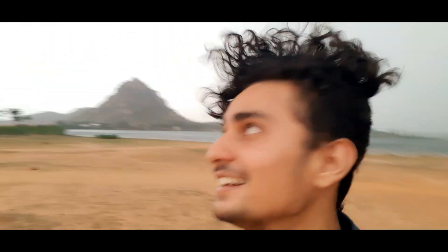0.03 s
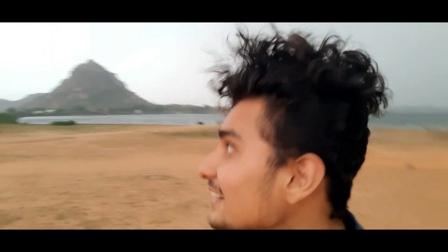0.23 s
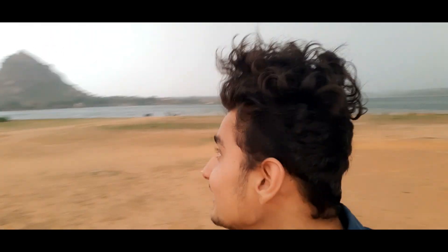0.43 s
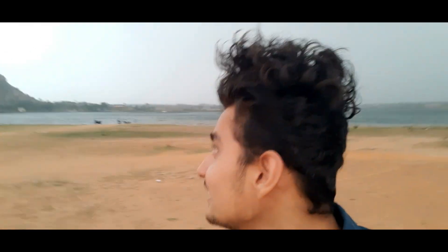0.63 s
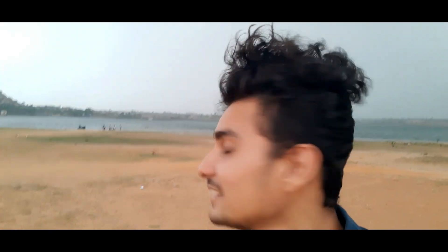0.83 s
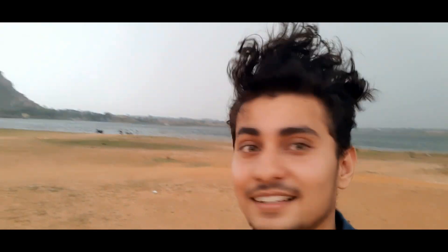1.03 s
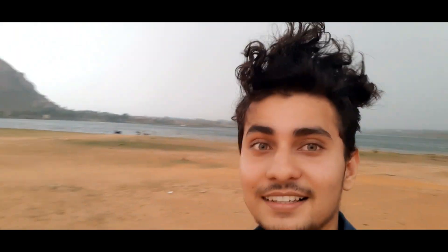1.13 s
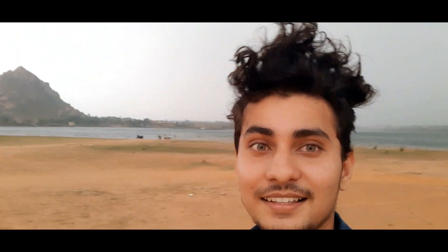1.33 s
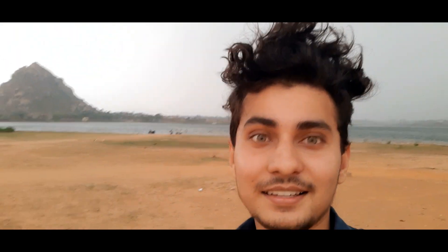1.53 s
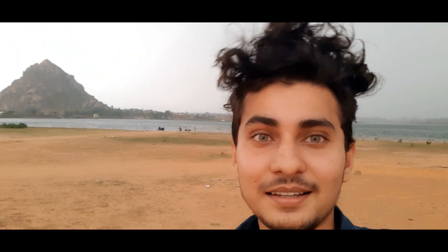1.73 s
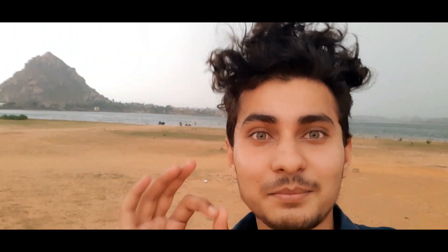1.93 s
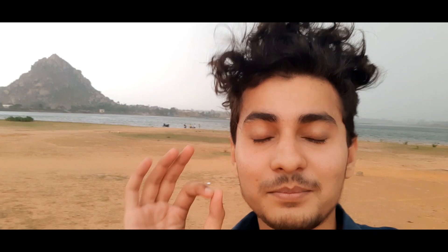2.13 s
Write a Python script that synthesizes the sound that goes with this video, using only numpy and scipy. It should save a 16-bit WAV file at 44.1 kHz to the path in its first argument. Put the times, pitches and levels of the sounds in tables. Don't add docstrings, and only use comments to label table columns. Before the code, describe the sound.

Wind roars and thumps against an unprotected microphone outdoors, rising and falling in rough gusts

```python
import sys
import numpy as np
from scipy import signal
from scipy.fft import rfft, irfft, next_fast_len
from scipy.io import wavfile
from scipy.ndimage import uniform_filter1d, minimum_filter1d

SR = 44100
rng = np.random.default_rng(int(sys.argv[2]) if len(sys.argv) > 2 else 0)


def digitize_waveform(pressure):
    field = np.atleast_2d(pressure).T
    bounded = np.clip(field, -1, 1)
    quanta = np.round(bounded * 32767).astype(np.int16)
    wavfile.write(sys.argv[1], SR, quanta)


def volts(x):
    e = np.asarray(x, float) / 20
    return 10 ** e


N = 96711

# (time [s], roar level [dB], eddy pitch [Hz])
AIR_LEFT = [(0, -13, 864), (.12, -44, 770), (.2, -35, 648), (.28, -22.5, 604), (.38, -48, 600),
            (.48, -35, 778), (.65, -42, 510), (.8, -37, 790), (.92, -21.5, 1080), (1.01, -37.5, 792),
            (1.08, -36.5, 1094), (1.16, -41, 710), (1.37, -41, 515), (1.47, -50.5, 1107), (1.58, -34, 860),
            (1.95, -39.5, 850), (2.05, -54, 800), (2.11, -46, 612)]
AIR_RIGHT = [(0, -30, 800), (0.108, -28, 808), (0.198, -36, 610), (0.278, -30.5, 970), (0.398, -38, 1290),
             (.52, -34, 703), (0.648, -37.5, 776), (0.741, -26.5, 1020), (0.821, -52.5, 940),
             (.91, -19.5, 983), (1.0, -45.5, 855), (1.2, -50, 463), (1.379, -42.5, 450), (1.48, -48, 1010),
             (1.63, -45, 666), (1.749, -34, 880), (1.972, -25.5, 1095), (2.118, -44.5, 654)]
# (time [s], level [dB], length [s], eddy pitch [Hz])
PUFFS_LEFT = [(0.047, -8.5, 0.0073, 960), (0.063, -23, 0.0276, 760), (0.083, -26, 0.0155, 750),
              (0.095, -19.5, 0.0288, 730), (0.106, -14.5, 0.0074, 870), (0.14, -13.5, 0.0069, 740),
              (0.165, -20.5, 0.011, 800), (0.244, -38.5, 0.0058, 820), (0.265, -17, 0.0056, 930),
              (0.44, -15.5, 0.0047, 660), (0.48, -13.5, 0.0026, 790), (0.508, -21, 0.02, 783),
              (0.54, -29, 0.0059, 610), (0.6, -21.5, 0.0064, 770), (0.709, -10.5, 0.004, 1230),
              (0.796, -24, 0.013, 820), (0.863, -2, 0.0011, 1307), (0.885, -25, 0.049, 750),
              (0.933, -3.5, 0.0019, 960), (1.046, -19.5, 0.013, 1090), (1.061, -20.5, 0.0267, 940),
              (1.13, -23.5, 0.011, 750), (1.415, -21.5, 0.022, 987), (1.43, -24.5, 0.0087, 1360),
              (1.455, -18, 0.016, 720), (1.478, -28.5, 0.013, 1053), (1.5, -15.5, 0.026, 947),
              (1.622, -25, 0.0044, 1014), (1.702, -18.5, 0.0073, 820), (1.723, -23, 0.0076, 736),
              (1.787, -11, 0.0057, 996), (1.84, -16, 0.0097, 816), (1.871, -15.5, 0.0057, 728),
              (1.906, -10.5, 0.0056, 920), (1.937, -4.5, 0.0047, 1074), (1.949, -13, 0.0056, 675),
              (1.973, -13.5, 0.0092, 846), (2.015, -9.5, 0.017, 926), (2.051, -21, 0.013, 770),
              (2.186, -27, 0.0088, 626)]
PUFFS_RIGHT = [(0.006, -1.5, 0.0064, 860), (0.036, -22.5, 0.055, 1020), (0.065, -24, 0.0063, 880),
               (0.099, -10, 0.013, 760), (0.25, -17.5, 0.0084, 1046), (0.414, -22.5, 0.0036, 1170),
               (0.451, -20, 0.0038, 787), (0.482, -18.5, 0.0065, 803), (0.519, -23, 0.011, 820),
               (0.54, -20, 0.0052, 603), (0.603, -15.5, 0.0029, 864), (0.716, -19.5, 0.02, 1277),
               (0.778, -17, 0.0057, 850), (0.856, -16.5, 0.0088, 1270), (0.882, -18.5, 0.006, 812),
               (0.905, -7, 0.0029, 880), (0.928, -15, 0.024, 1040), (0.966, -12, 0.0033, 960),
               (1.016, -20.5, 0.0064, 950), (1.043, -19, 0.0095, 1000), (1.063, -29, 0.016, 777),
               (1.406, -17, 0.0032, 910), (1.448, -11.5, 0.0043, 852), (1.481, -15.5, 0.013, 1070),
               (1.5, -13.5, 0.007, 972), (1.608, -22.5, 0.004, 1055), (1.7, -16.5, 0.0071, 1037),
               (1.747, -19, 0.023, 755), (1.763, -11.5, 0.0087, 940), (1.782, -11, 0.0052, 1070),
               (1.837, -15.5, 0.0089, 778), (1.871, -26.5, 0.0081, 820), (1.904, -12, 0.0032, 990),
               (1.94, -8.5, 0.0097, 1250), (1.96, -4.5, 0.0057, 910), (2.011, -9.5, 0.012, 1110),
               (2.051, -13, 0.01, 632), (2.131, -21.5, 0.0085, 743), (2.167, -28.5, 0.0091, 700),
               (2.187, -32, 0.0067, 530)]
# (frequency over eddy pitch [ratio], level [dB])
EDDY_TONE = [(.3, -4.5), (.6, -5), (1.0, -7.5), (1.5, -18.5), (2.5, -34.5), (4.0, -58), (12, -92)]
# (frequency [Hz], level [dB])
PORT_TONES = [
    [(1500, -2.5), (3000, -6.5), (6000, -9)],
    [(1500, -5.5), (3000, -11.5), (6500, 1), (7400, -9)],
]
# (frequency [Hz], level [dB])
ROAR_LOW_CUT = [(90, -31.5), (260, 0.5)]

# (time [s], level [dB])
TICKS_LEFT = [(.005, -58), (.022, -53.5), (.047, -51.5), (.82, -64), (.956, -51), (1.058, -62.5),
              (1.068, -56.5), (1.082, -51), (1.417, -61.5), (1.432, -53.5), (1.533, -56), (1.545, -66),
              (1.586, -69), (1.641, -64.5), (1.653, -56), (.915, -62)]
TICKS_RIGHT = [(.005, -51.5), (.038, -52.5), (.096, -57.5), (.254, -59), (.289, -51), (.311, -79),
               (.324, -46.5), (.376, -53.5), (.39, -48), (.394, -57), (.44, -54), (.619, -59), (.688, -52),
               (.744, -73.5), (.782, -50.5), (.789, -52), (1.701, -62), (1.735, -49), (1.762, -39.5),
               (1.794, -54.5), (1.822, -51), (1.876, -50.5), (1.982, -41), (2.003, -47)]
# (frequency [Hz], level [dB])
TICK_TONE = [(1200, -18), (2400, 8), (3500, -8.5), (4600, -7), (6500, -18.5), (7500, -35)]
# (time [s], level [dB])
FIZZ_LEFT = [
    (.8, -88),
    (.9, -70),
    (1.1, -74),
    (1.2, -81),
    (1.39, -84),
    (1.43, -74.5),
    (1.68, -73),
    (1.74, -81.5),
]
# (time [s], level [dB])
STOPS = [
    (1.938, -19),
    (2.0148, -19),
]
# (frequency [Hz], level [dB])
SLAP_TONE = [(900, -68), (2500, 10), (5500, -5), (7200, -17), (10000, -14.5), (15000, -30)]

# (time [s], rumble level [dB])
RUMBLE = [(0, -14), (.11, -23.5), (.18, -28), (.26, -21.5), (.4, -31.5), (.47, -28.5), (.65, -31),
          (.78, -29.5), (.93, -23.5), (1.0, -26), (1.08, -30.5), (1.38, -32.5), (1.47, -29.5),
          (1.62, -27.5), (1.76, -26), (2.01, -27.5), (2.08, -30.5), (2.14, -32.5)]
# (frequency [Hz], level [dB])
RUMBLE_TONE = [(20, -31), (45, -6.5), (70, -5.5), (120, -1), (240, -4), (330, -7.5), (520, -24),
               (3000, -120)]
# (time [s], rise [dB])
THUMPS = [(0.074, 3.5), (.114, 7.5), (0.512, 6.5), (0.578, 5), (.76, 10.5), (.858, -2), (.888, 2),
          (1.245, 1), (1.31, 8.5), (1.455, 7.5), (1.503, 3), (1.615, -2), (1.896, 4.5), (1.98, -0.5),
          (2.016, 14.5), (2.054, 11)]
# (middle [s], length [s], depth [dB])
RUMBLE_GAPS_LEFT = [
    (.83, 0.011, -42),
    (1.085, 0.045, -18.5),
    (1.175, 0.033, -7),
    (1.56, 0.12, -17),
    (1.66, 0.049, -50),
]
RUMBLE_GAPS_RIGHT = [
    (0.385, 0.12, -48),
    (0.659, 0.057, -17),
    (0.75, 0.035, -11.5),
    (0.81, 0.024, -6),
    (1.77, 0.027, -7),
    (2.148, 0.08, -21.5),
]
# (time [s], level [dB], pitch [Hz])
SHOVES = [
    (.262, -15, 89),
    (.95, -16, 72),
    (1.015, -15, 110),
    (1.129, -11.5, 90),
    (1.739, -15.5, 106.5),
    (1.851, -17, 80),
    (1.94, -12, 127),
]

# (frequency [Hz], level [dB])
SURF_TONE = [(300, 2.5), (1000, -16.5), (2200, -23), (6000, -64)]
# (frequency [Hz], level [dB])
HISS_TONE = [(1500, -12), (3500, -5.5), (6500, -3.5), (7500, -33.5)]
# (time [s], rise [dB])
WHISTLE = [
    (.2, 4),
    (0.331, 6.5),
    (0.501, 3.5),
    (1.68, 2.5),
    (1.9, 16),
    (2.06, 6),
]


def evened(x):
    return x / np.sqrt(np.mean(x ** 2) + 1e-20)


def read(points, x):
    place, value = np.transpose(points)
    return np.interp(np.log(x + 0.0011), np.log(place), value)


def over_time(points):
    return np.interp(np.arange(N) / SR, *np.transpose(points))


def colour(x, tone):
    size = next_fast_len(2 * N)
    gain = volts(read(tone, np.fft.rfftfreq(size, 1 / SR)))
    return irfft(rfft(x, size) * gain, size)[:N]


def smoothed(x, span):
    return uniform_filter1d(uniform_filter1d(x, span), span)


def chance(rate_hz):
    ratio = np.fft.rfftfreq(N, 1 / SR) / rate_hz
    low_pass = 1 / (1 + ratio ** 2)
    high_pass = (6 * ratio) ** 2 / (1 + (6 * ratio) ** 2)
    x = evened(irfft(rfft(rng.standard_normal(N)) * low_pass * high_pass, N))
    return 2 * np.tanh(x / 2)


def roar(air, puffs, port_tone, flutter_db):
    flutter_hz, wander = 80, 0.15
    puff_rise, puff_fall, shortest_s = 0.3, 0.61, 0.005
    hold, hold_s = 0.64, 0.0032
    t = np.arange(N) / SR
    s, level_db, pitch_hz = np.transpose(air)
    slow_db = np.interp(t, s, level_db)
    rough = np.clip((slow_db + 58) / 22, 0, 1)
    power = volts(slow_db + rough * flutter_db * chance(flutter_hz)) ** 2
    pitch = np.interp(t, s, pitch_hz) * np.exp(rough * wander * chance(flutter_hz / 2))
    pitched = power * pitch
    for at, db, length, hz in puffs:
        width = max(length, shortest_s) * np.where(t < at, puff_rise, puff_fall)
        puff = volts(db) ** 2 * np.exp(-((t - at) / width) ** 2)
        power = power + puff
        pitched = pitched + puff * hz

    eddy_hz = uniform_filter1d(pitched, size=128) / uniform_filter1d(power, size=128)
    noise = np.sqrt(power) * rng.standard_normal(N)
    f, frames, z = signal.stft(noise, SR, nperseg=256, noverlap=224)
    gain = volts(read(EDDY_TONE, f[:, None] / np.interp(frames, t, eddy_hz)))
    gain = gain / np.sqrt((gain ** 2).mean(0)) * volts(read(port_tone, f))[:, None]
    x = signal.istft(z * gain, SR, nperseg=256, noverlap=224)[1][:N]

    span = round(hold_s * SR)
    meant = abs(smoothed(power, span)) + 1e-12
    got = abs(smoothed(x ** 2, span)) + 1e-12
    return colour(x * (meant / got) ** (hold / 2), ROAR_LOW_CUT)


def rumble():
    shared, lumpy_db, lump_hz = 0.46, 2, 23.7
    thump_s, steady, steady_s = 0.015, 0.61, 0.0099
    t = np.arange(N) / SR
    common = rng.standard_normal(N) * volts(lumpy_db * chance(lump_hz))
    level_db = over_time(RUMBLE)
    for at, db in THUMPS:
        level_db = level_db + db * np.exp(-((t - at) / thump_s) ** 2)
    span = round(steady_s * SR)
    out = []
    for gaps in (RUMBLE_GAPS_LEFT, RUMBLE_GAPS_RIGHT):
        own = rng.standard_normal(N) * volts(lumpy_db * chance(lump_hz))
        dip_db = sum(db * np.exp(-(2 * (t - at) / length) ** 4) for at, length, db in gaps)
        swing = evened(colour(shared * common + (1 - shared) * own, RUMBLE_TONE))
        slow = smoothed(swing ** 2, span)
        steadied = swing / (abs(slow) + 1e-9) ** (steady / 2)
        out.append(volts(level_db + dip_db) * steadied)
    return np.array(out)


def shoves():
    length_turns, sag = 0.95, 0.15
    t, out = np.arange(N) / SR, np.zeros((2, N))
    for (at, db, hz), (phase, skew) in zip(SHOVES, rng.random((len(SHOVES), 2))):
        turns = (t - at) * hz
        shape = volts(db) * np.exp(-(turns / length_turns) ** 2)
        sagging = turns * (1 - sag * np.tanh(turns / 2))
        for port in out:
            port += shape * np.cos(2 * np.pi * (sagging + phase))
            phase += skew - 0.5
    return out


def slaps():
    clicks, unit = np.zeros((2, N))
    for at, db in STOPS:
        clicks[round(at * SR)] = volts(db)
    unit[0] = 1
    return colour(clicks, SLAP_TONE) / colour(unit, SLAP_TONE)[0]


def ticks(flicks, fizz):
    tick_s = 0.0013
    t = np.arange(N) / SR
    shape = fizz * volts(4.0 * chance(150))
    for at, db in flicks:
        shape = shape + volts(db) * np.exp(-((t - at) / tick_s) ** 2)
    return volts(7.0) * shape * evened(colour(rng.standard_normal(N), TICK_TONE))


def background():
    surf_db, hiss_db, self_noise_db = -54, -77, -80.5
    a, b, c, d, e = rng.standard_normal((5, N))
    hiss = volts(hiss_db + over_time(WHISTLE)) * evened(colour(c, HISS_TONE))
    surf_tone = SURF_TONE + [(20000, -91)]
    surf = np.array([evened(colour(colour(v, ROAR_LOW_CUT), surf_tone)) for v in (a, b)])
    circuit = np.array([d + e / 2, e + d / 2])
    return volts(surf_db) * surf + np.array([0 * hiss, hiss]) + volts(self_noise_db) * circuit


def scene():
    left = roar(AIR_LEFT, PUFFS_LEFT, PORT_TONES[0], flutter_db=7)
    left = left + ticks(TICKS_LEFT, volts(over_time(FIZZ_LEFT)))
    right = roar(AIR_RIGHT, PUFFS_RIGHT, PORT_TONES[1], flutter_db=8)
    right = right + ticks(TICKS_RIGHT, 0) + slaps()
    return np.array([left, right]) + rumble() + shoves() + background()


def band_limit(x):
    return signal.sosfilt(signal.butter(12, 15500, fs=SR, output="sos"), x)


def record(dry):
    ceiling = 0.93
    room = np.minimum(ceiling / (abs(dry) + 1e-9), 1)
    room = minimum_filter1d(room, size=201, axis=1)
    held = dry * uniform_filter1d(room, size=200, axis=1)
    from_end = np.minimum(np.arange(N), np.arange(N)[::-1])
    mix = held * np.minimum(0.4 + from_end / 80, 1)
    return band_limit(mix)


dry = scene()
out = record(dry)
digitize_waveform(out)
```